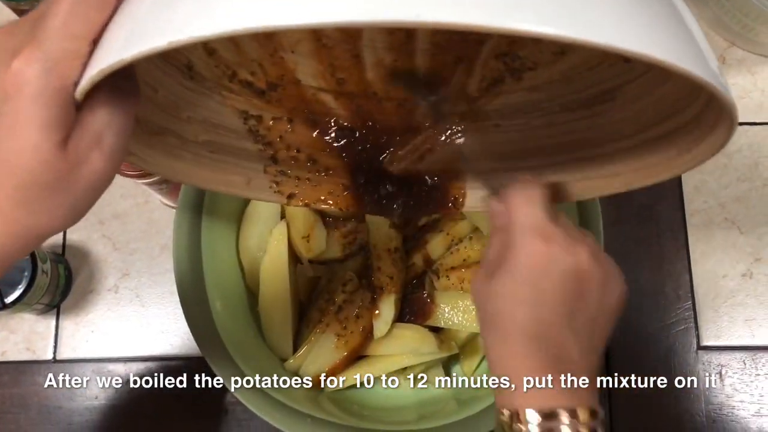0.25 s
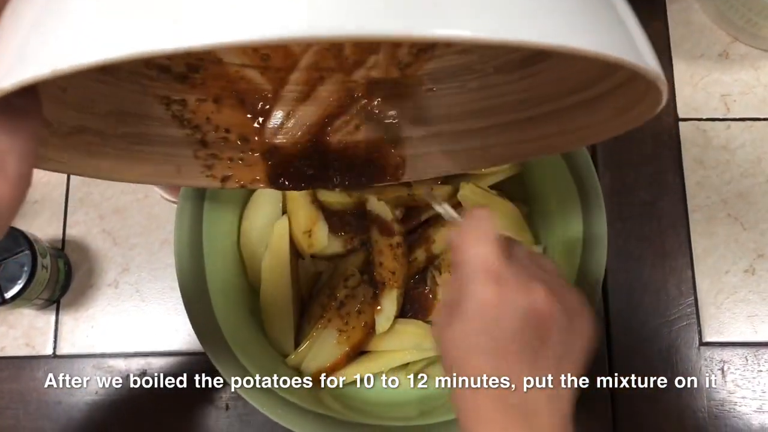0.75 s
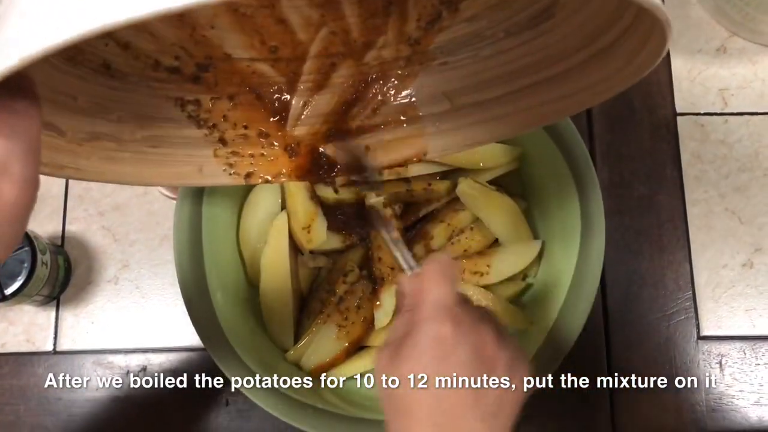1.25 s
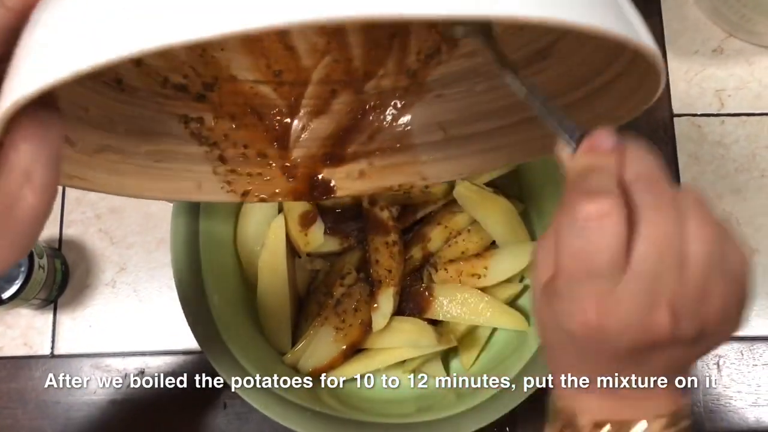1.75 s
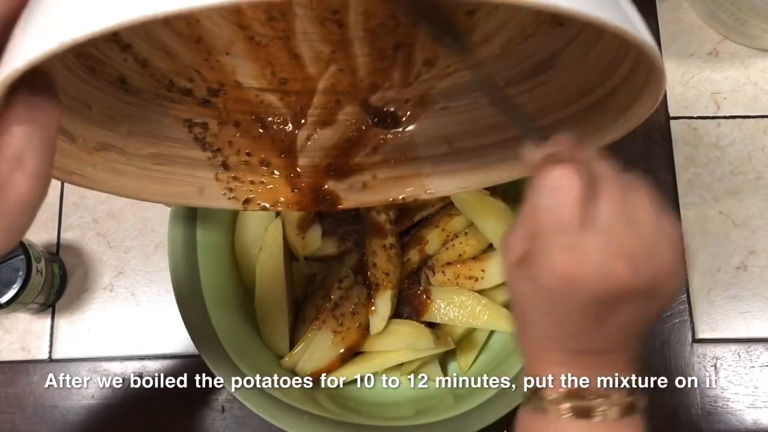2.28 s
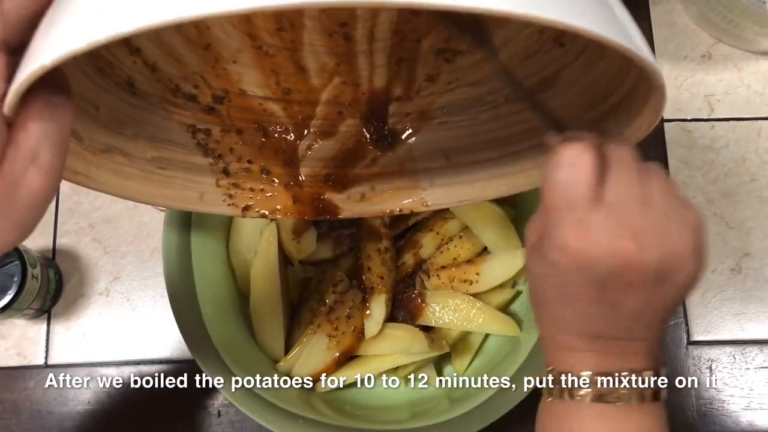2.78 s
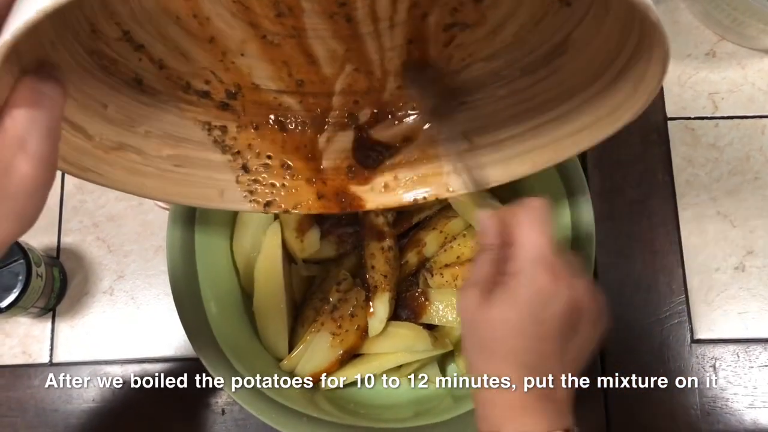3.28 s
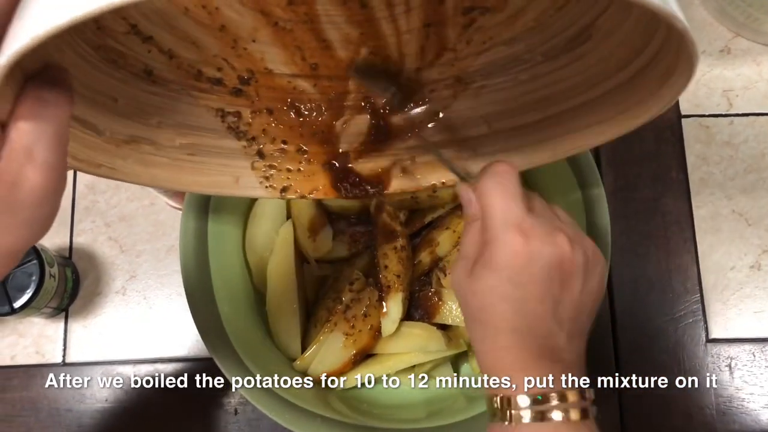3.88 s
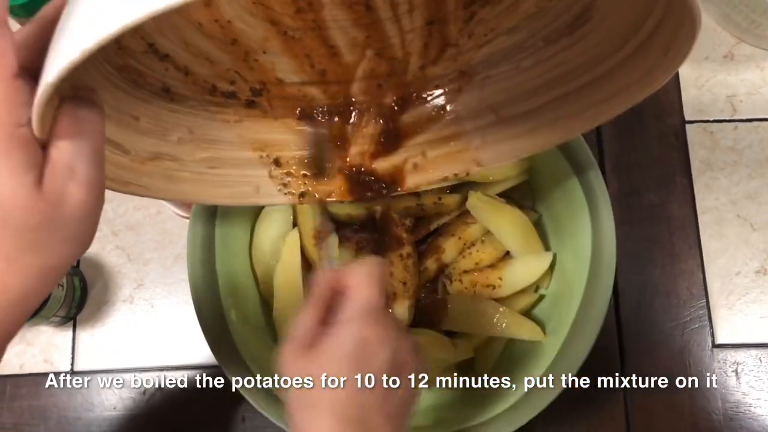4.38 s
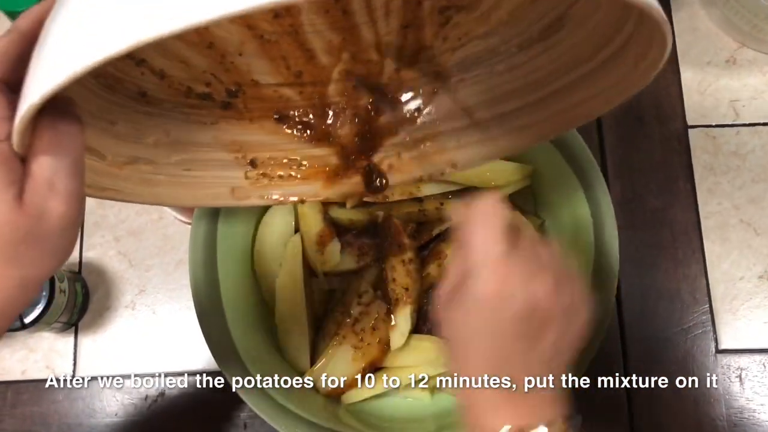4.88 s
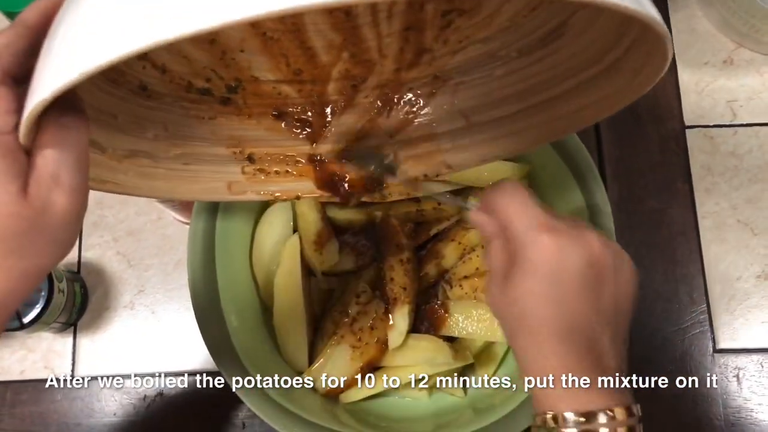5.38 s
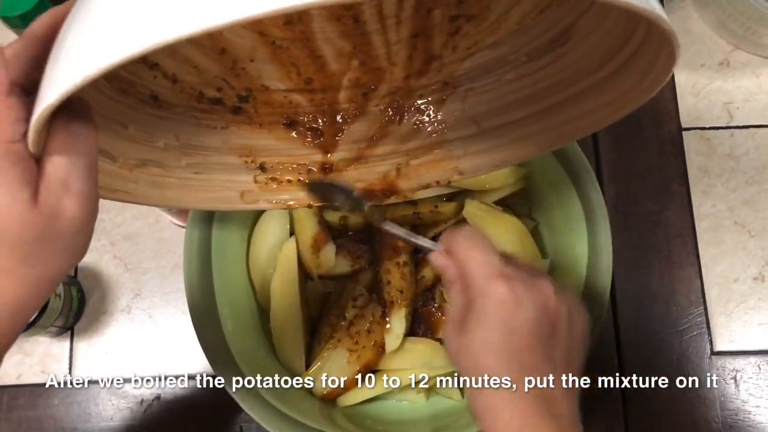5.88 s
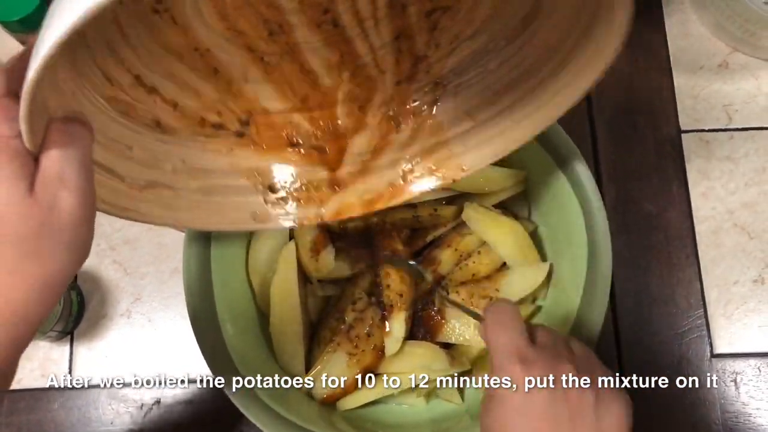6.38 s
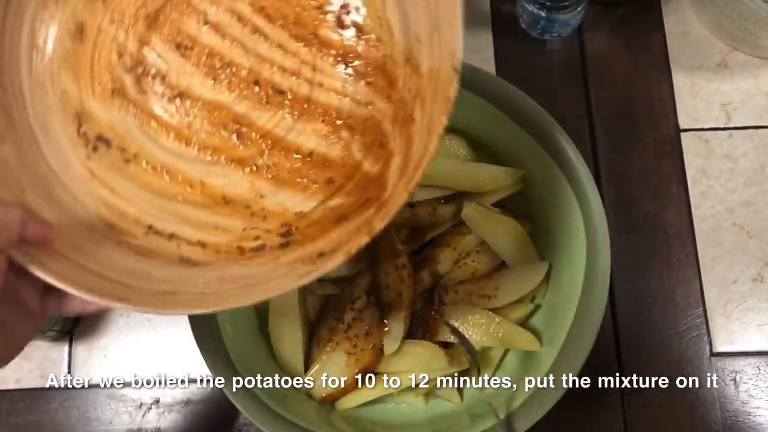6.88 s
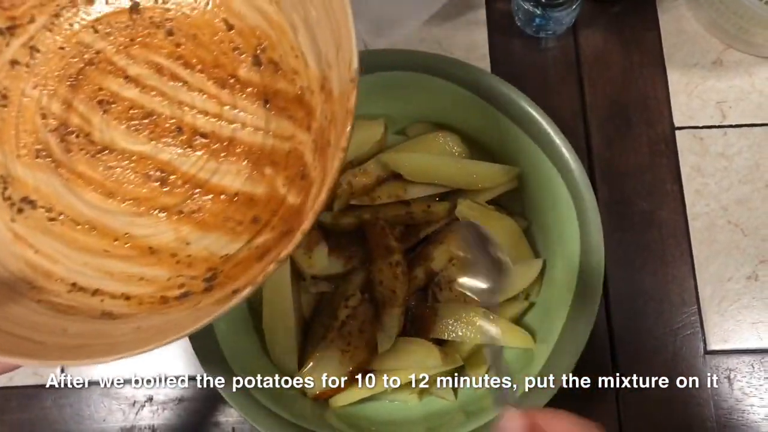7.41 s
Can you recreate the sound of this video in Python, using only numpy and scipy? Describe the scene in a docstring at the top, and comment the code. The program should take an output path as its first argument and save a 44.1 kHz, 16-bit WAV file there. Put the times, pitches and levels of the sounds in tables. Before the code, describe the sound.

A metal spoon knocks and scrapes grittily inside a wooden bowl in quick repeated strokes, then clacks several times on a plastic rim.

```python
"""Scraping and tapping bowls

A steel spoon lands on the inside of a tilted wooden bowl and drags gritty oil down its grain, stroke after
stroke; then four taps, one with a bounce, strike the rim of a plastic bowl of potatoes. Shocks and random
grit forces excite banks of resonances; a small hard kitchen answers with decaying noise. An appliance hums
and drones as filtered noise and wavering sines, and the close microphone clips on the hardest blows."""
import sys
import numpy as np
from scipy import signal
from scipy.fft import rfft, irfft, next_fast_len
from scipy.io import wavfile
from scipy.ndimage import uniform_filter1d, map_coordinates

SR = 44100
rng = np.random.default_rng(int(sys.argv[2]) if len(sys.argv) > 2 else 0)


def file_out(sig):
    """Save sig as 16-bit WAV at sys.argv[1]."""
    # one column per channel
    cols = np.atleast_2d(sig).T
    # limit, then scale
    lim = np.clip(cols, -1, 1)
    pcm = np.round(lim * 32767).astype(np.int16)
    wavfile.write(sys.argv[1], SR, pcm)


N = 337365
TIME = np.arange(N) / SR

# Pulls of the spoon: bite t/s, full-speed t/s, lift t/s; drag level/dB at these three moments, before judder;
# thud and grit hiss relative level/dB at full speed; wall relative level/dB at bite, at lift;
# squeak f/Hz at bite, at lift
PULLS = [(0.0, 0.022, 0.062, -33, -33.5, -33.5, -5.5, -6, -4, -10, 3080, 2930),
         (0.206, 0.25, 0.32, -26, -24, -21.5, -9, -8.5, 0, -9, 2050, 4500),
         (0.512, 0.594, 0.63, -32.5, -20.5, -28.5, -18.5, -8, -9, -8.5, 3230, 3450),
         (0.779, 0.91, 0.95, -40.5, -24, -27, -22, -2.5, 6, -7, 2590, 4530),
         (1.142, 1.192, 1.238, -44, -20, -22.5, -24, -6.5, 1.5, -11.5, 2520, 3000),
         (1.394, 1.483, 1.495, -43.5, -21, -31.5, -21, -4, 3.5, -20, 2300, 3140),
         (1.79, 1.89, 1.94, -50.5, -44, -37, -6.5, -1.5, -8, -14, 2930, 3400),
         (1.937, 2.06, 2.128, -28, -26, -37, -10.5, -6, -16, -8.5, 2270, 2840),
         (2.363, 2.47, 2.546, -27, -21.5, -23, -11.5, -10.5, 4, -0.5, 2120, 1950),
         (2.675, 2.695, 2.695, -41.5, -41, -46, -4, -2.5, 2, 7.5, 1850, 2040),
         (2.729, 2.763, 2.867, -47.5, -32, -29, -7.5, -6, 3.5, -5.5, 1860, 2830),
         (3.025, 3.053, 3.09, -42.5, -41.5, -47, 4.5, -1, 5, -9, 3930, 4200),
         (3.084, 3.11, 3.172, -21.5, -29, -33, -6.5, -6.5, -3, -2.5, 3250, 3000),
         (3.305, 3.396, 3.425, -35.5, -24.5, -26, -14.5, -5.5, -4, -4.5, 3500, 3320),
         (3.573, 3.64, 3.653, -40, -25, -23, -23, 0.5, -4, -6.5, 3020, 3970),
         (3.846, 3.924, 3.976, -30.5, -31.5, -36.5, -8.5, -5.5, -12, -13, 3220, 3485),
         (4.27, 4.324, 4.415, -39, -22, -28, -15, -8.5, -9, -8, 3000, 3450),
         (4.574, 4.617, 4.678, -39, -28, -20, -18.5, -6.5, -3, -10.5, 2000, 2780),
         (4.927, 4.954, 4.99, -31, -35, -32.5, -0.5, -8, -3, -7, 2930, 3150),
         (4.984, 5.04, 5.04, -25, -13, -21, -24.5, -5.5, -9, -12.5, 3060, 3410),
         (5.191, 5.268, 5.307, -43, -19.5, -22, -18.5, -2.5, -4.5, -5.5, 3097, 3670),
         (5.468, 5.54, 5.572, -44, -24, -25, -24, -2, -1, -2, 3120, 4000),
         (5.766, 5.846, 5.865, -30.5, -19.5, -26.5, -17, -6, -9, -4, 3540, 2600),
         (6.061, 6.1, 6.128, -42.5, -25, -27, -17.5, -8, 1, -7.5, 2190, 2970),
         (6.141, 6.15, 6.162, -27, -22.5, -26, -17, -5, -11, -9, 2810, 2850)]
# Spoon coming down on the wood: t/s, peak level/dB, wall, thud and click relative level/dB, clack f/Hz
LANDINGS = [(0.2008, -14.5, -8, -5, -0.5, 1830), (0.5063, -4.5, -9, -17.5, -4.5, 3500),
            (0.7752, 1.5, -3, -19, -16.5, 3000), (1.1218, -5.5, 5, -21, -18, 1719),
            (1.3705, -17, 7.5, -6, -2, 1510), (1.788, -25, -7, -4.5, -7, 2940),
            (1.8454, -25.5, 0, -16, -20, 2780), (2.3578, -2, -4.5, -14, -19, 2660),
            (2.6687, -20, -16, -23, -12, 1840), (3.0205, -18, -4, -2.5, -7, 2640),
            (3.0825, -2, -3.5, -14, -12.5, 4900), (3.2849, -11.5, -2.5, -2, -10, 1990),
            (3.55, 2.5, -11, -19, -3.5, 2860), (3.8471, -10, 0.5, -9.5, -22, 2850),
            (4.2626, -16.5, -25, -12, -5.5, 3005), (4.5439, -1.5, -0.5, -13, -32, 1550),
            (4.9072, -5.5, -6.5, -6, 2, 3324), (5.1739, -6, -9.5, -21, -3, 5100),
            (5.455, -6, -2, -12.5, 4, 3200), (5.7482, -6.5, 4, -17.5, -8.5, 1490),
            (6.0442, -11.5, 8, -14, -3, 1560)]
# Spoon skipping over a ridge of the grain: t/s, peak level/dB, wall relative level/dB, contact t/s
SKIPS = [(0.0213, -14, -11, .001), (0.0564, -13.5, -20, 0.0038), (0.2621, -14, -3, .0016),
         (0.3003, -18, -22, .0015), (0.8937, -12, -20, 0.0022), (1.2256, -10, -13, .0035),
         (1.4745, -11.5, -11, 0.0018), (1.993, -15, -11, 0.0022), (2.4169, -12, 1, .004),
         (2.5003, -13.5, 2, .003), (2.8558, -11, -20, 0.0012), (2.698, -30, -6, 0.0016),
         (3.307, -19, -10, 0.0016), (3.582, -28.5, -18, .0015), (3.5908, -10.5, -14, .0011),
         (3.6255, -21, -18, 0.0017), (3.6621, -13, -9, 0.0015), (3.8516, -10.5, -4, 0.00194),
         (3.8655, -8, -16, .001), (3.8712, -14, -7, 0.0022), (4.0, -34, -21, .0015),
         (4.3322, -14.5, -9, 0.0018), (4.361, -13.5, -5, 0.0011), (4.66, -1.5, -8.5, .002),
         (4.9849, -8, -4.5, 0.0018), (5.028, -1, -29, .0012), (5.2376, -21, -5, 0.0014),
         (5.2738, -11, -22, 0.0014), (5.53, -16.5, -8, 0.0013), (6.088, -16, -15, .002),
         (6.143, -13.5, -7, 0.0014)]
# Spoon gripping so that the wall sings: t/s, half length t/s, level/dB
GRIPS = [(0.22, 0.016, -19.5), (0.858, .012, -27), (1.444, .008, -27.5), (2.422, 0.007, -10.5),
         (2.512, .014, -14), (2.689, .015, -35), (2.802, .01, -23), (3.61, .012, -35), (4.366, .008, -29),
         (4.609, .012, -25.5)]
# Taps on the plastic rim, one with a bounce: t/s, peak level/dB, clack f/Hz
TAPS = [(6.6438, -0.5, 1710), (6.7007, -18.5, 1550), (6.8333, -6, 1550), (7.0092, 3.5, 2260),
        (7.1555, -5, 1700)]
# A faint creak: from t/s, to t/s, slip rate f/Hz, peak level/dB, resonance f/Hz, width f/Hz
CREAK = (4.178, 4.252, 130, -39, 3000, 2600)
# Soft rustles: t/s, fading t/s per 20 dB, level/dB, centre f/Hz, width f/Hz
RUSTLES = [(7.45, .12, -54, 5000, 7000), (7.555, .06, -58, 10800, 2000)]

# Resonances, each: f/Hz, width f/Hz, relative level/dB
# spoon pressed on wood
SPOON_MODES = [(1406, 153, -5), (1728, 170, -2.5), (1950, 370, -10), (2060, 430, -11.5), (2614, 384, -3),
               (3000, 200, 0), (3330, 296, -3.5), (4000, 790, -7), (4900, 440, -2), (5570, 550, -3.5),
               (6295, 1070, -5.5)]
# wooden wall
WALL_MODES = [(770, 110, -12), (930, 140, -12), (1075, 80, 0), (1250, 200, -13), (1790, 95, -6),
              (2230, 90, -11)]
# whole wooden bowl in the hand
WOOD_BOWL_MODES = [(205.5, 56, -5), (283, 140, -6.5), (368.6, 56, -0.5), (437.5, 49.5, 0), (666, 45, 2.5)]
# spoon edge
EDGE_MODES = [(6990, 550, 1.5), (8300, 4600, -3.5), (11280, 1130, -1), (12980, 560, 0), (15330, 2900, -3.5)]
# rim of the plastic bowl
RIM_MODES = [(1486, 134, 1.5), (1765, 330, 2.5), (2460, 560, -4), (3420, 320, -1.5), (4570, 1000, -5.5),
             (5780, 1700, -7.5), (7940, 2700, -15), (11300, 4000, -24)]
# side of the plastic bowl
SIDE_MODES = [(470, 60, -6), (575, 60, 0), (690, 130, -11), (900, 250, -15), (1180, 220, -11)]
# filled plastic bowl
FILLED_MODES = [(136, 57.96, -8.5), (223.01, 48, -1), (302, 49, -1), (366, 65, 0.5)]

# Gain of the whole bowl and of the edge for each dB of drag: level/dB per dB
GROWTH = (.3, 1.25)
# Drift of the whole bowl and of the edge as the spoon nears the rim: level/dB per s
DRIFT_DB_PER_S = (-27.5, 10)
# Spectrum of the appliance drone: f/Hz, relative level/dB per Hz
DRONE_SPECTRUM = [(30, -38), (75, -10.5), (100, -2.5), (135, 1.5), (165, -7.5), (200, -1.5), (340, -4.5),
                  (420, -13), (800, -10.5), (1500, -23), (3200, -21), (7000, -31.5), (16000, -39)]
# Tones of the appliance: f/Hz, level/dB, waver level/dB, phase drift/rad
TONES = [(52.5, -54, 1, .2), (3060, -73, 6, 0.88), (5950, -75, -1.5, 1.5), (6500, -74.5, 6, 1.5)]
# Decay of the kitchen: f/Hz, t60 t/s
KITCHEN_DECAY = [(100, 0.65), (700, 0.46), (1840, 0.39), (4850, 0.32), (12800, 0.15)]

BITE_S, LIFT_DB_PER_S = 0.0072, 951  # the spoon bites at once and leaves the wood more slowly
LANDING_CONTACT_S, TAP_CONTACT_S = 0.001627, 0.0019
SKIP_THUD_DB, SKIP_CLICK_DB = -24, -6.5  # the click is counted from the grit hiss of the moment
TAP_SIDE_DB, TAP_THUD_DB, TAP_CLICK_DB = -1.5, -10.5, -28
DRONE_DB = -48
DULL_FROM_HZ, TOP_HZ = 15650, 16688


def amp(db):
    """Decibel law: a level becomes an amplitude factor."""
    return 10 ** (np.asarray(db) / 20)


def unit(x):
    """Normalisation to unit root mean square."""
    return x / np.sqrt(np.mean(x ** 2) + 1e-20)


def along(points, hz):
    """Linear interpolation of (Hz, value) points on a logarithmic frequency axis."""
    f, v = np.transpose(points)
    return np.interp(np.log(hz + 1), np.log(f + 1), v)


def wobble(rate):
    """Spline interpolation of random knots, rate of them a second: a smooth random curve."""
    knots = rng.standard_normal(int(N * rate / SR) + 4)
    return map_coordinates(knots, [TIME * rate])


def filtered(x, response):
    """Convolution theorem: the spectrum of x is multiplied by a complex response of frequency."""
    m = next_fast_len(len(x) + 8192)
    return irfft(rfft(x, m) * response(np.fft.rfftfreq(m, 1 / SR)), m)[:len(x)]


def body(modes, shift_db=0):
    """Modal superposition: damped resonators add with alternating signs into one causal response."""
    centre, width, db = (np.transpose(modes) + np.outer([0, 0, 1], shift_db))[:, :, None]
    gain = (-1.) ** np.arange(len(centre))[:, None] * amp(db)

    def response(f):
        damping = 1j * f * width
        return np.sum(gain * damping / (centre * centre - f * f + damping), axis=0)
    return response


def grit(per_second, spread_db, smooth_db):
    """Shot noise: grains snap in clumps under the edge, on a white bed of smooth rubbing."""
    crowd = per_second * amp(3 * wobble(120))
    size = amp(spread_db * np.minimum(rng.exponential(size=N), 3.5))
    snaps = (rng.random(N) < crowd / SR) * size * rng.standard_normal(N)
    return unit(snaps) + amp(smooth_db) * rng.standard_normal(N)


def squeak_hz():
    """Frequency glide: the squeak moves linearly from bite to lift of each pull."""
    rows = np.array(PULLS)
    return np.interp(TIME, rows[:, [0, 2]].ravel(), rows[:, -2:].ravel())


def stroke_levels():
    """Level laws in dB for spoon, wall, whole bowl and edge: all follow the drag, each in its own way."""
    level_db = np.full((4, N), -120.)
    for bite, full, lift, bite_db, full_db, lift_db, thud_db, hiss_db, *wall_db in np.array(PULLS)[:, :-2]:
        on = (TIME > bite - BITE_S) & (TIME < lift + .06)
        t = TIME[on]
        drag_db = np.interp(t, [bite, full, lift], [bite_db, full_db, lift_db])
        bite_loss_db = 15 * np.clip((bite - t) / BITE_S, 0, 1)
        lift_loss_db = LIFT_DB_PER_S * np.clip(t - lift, 0, None)
        growth_db = np.outer(GROWTH, drag_db - full_db)
        drift_db = np.outer(DRIFT_DB_PER_S, t - full)
        thud, hiss = full_db + np.c_[[thud_db, hiss_db]] + growth_db + drift_db
        wall = drag_db + np.interp(t, [bite, lift], wall_db)
        db = np.array([drag_db, wall, thud, hiss]) - bite_loss_db - lift_loss_db
        level_db[:, on] = np.maximum(level_db[:, on], db)  # the stronger of two overlapping pulls
    return level_db


def sliding(x, centre_hz, boost_db, octaves, patchy_db):
    """Moving contact point: a broad resonance glides, the sound dulls above it and its colour flickers."""
    hz, t, z = signal.stft(x, SR, nperseg=256)
    centre = np.interp(t, TIME, centre_hz)
    octaves_above = np.log2((hz[:, None] + 1) / centre)
    glide_db = boost_db * np.exp(-.5 * (octaves_above / octaves) ** 2)
    dulling_db = -3.56 * np.clip(octaves_above, 0, 1.5)
    patches = uniform_filter1d(rng.standard_normal(z.shape), 4, axis=0)
    patches = unit(uniform_filter1d(patches, 6, axis=1))
    coloured = z * amp(glide_db + dulling_db + patchy_db * patches)
    return unit(signal.istft(coloured, SR, nperseg=256)[1][:N])


def scraping(squeak, levels_db):
    """Friction drive: the dragged spoon shakes itself, wall, bowl and edge, juddering over the wood grain."""
    force = grit(per_second=2500, spread_db=2.5, smooth_db=-0.5)
    slid = sliding(force, squeak, boost_db=4, octaves=0.22, patchy_db=4.5)
    judder = wobble(70)
    # modes, driving force, judder depth/dB, locking exponent
    parts = [(SPOON_MODES, slid, 2.3, 0.069), (WALL_MODES, force, 2.5, 0.74),
             (WOOD_BOWL_MODES, force, 1.1, 0.45), (EDGE_MODES, slid, 2.74, 0.16)]
    layers = []
    for (modes, push, depth_db, lock), db in zip(parts, levels_db):
        shake = unit(filtered(push, body(modes)))
        swing = np.sqrt(np.abs(uniform_filter1d(shake ** 2, size=500)) + 1e-3)
        # stick-slip locks to the ringing wood and evens out its swing
        layers.append(amp(db + depth_db * judder) * unit(shake / swing ** lock))
    spoon, wall, bowl, edge = layers
    # the open bowl beams the note of its wall at the microphone; the room gets less of it
    return np.array([spoon + wall + bowl + edge, spoon + amp(-4.5) * wall + bowl + edge])


def blows(events, bodies, scatter_db, lag, clack_db):
    """Impact excitation: four groups of modes ring at new strengths, close by and, smoother, to the walls."""
    out, t = np.zeros((2, N + SR)), np.arange(SR // 8) / SR
    for s, db, *relative_db, clack_hz, contact in events:
        u = t / max(contact, 2e-4)
        noise = rng.standard_normal(len(t))
        shock = 1. * (np.arange(len(t)) == round(.7 * contact * SR))
        struck = sorted(bodies[0] + [(clack_hz, 260, clack_db)])  # the spot that is hit adds its short note
        # heavy modes feel mostly one shock, light ones the chatter, which dies soonest at the edge
        groups = zip((struck, *bodies[1:]), db + np.r_[0, relative_db],
                     (.9, 1.1, 1.2, 1.6),      # haste of the chatter
                     (0.72, 0.27, 0.3, 1.0),   # share of chatter
                     (0, 0, lag, 0),           # delay t/s
                     (0, -1.5, 1, -2))         # level/dB sent to the walls
        for modes, level_db, haste, rough, late, far_db in groups:
            chatter = noise * (haste * u) * np.exp(-haste * u)
            push = rough * chatter / np.linalg.norm(chatter) + (1 - rough) * shock
            response = body(modes, rng.normal(0, scatter_db, len(modes)))
            near = filtered(push, response)
            near /= np.abs(near).max()
            far = amp(far_db) * unit(filtered(shock, response)) * np.std(near)
            out[:, round((s + late) * SR):][:, :len(t)] += amp(level_db) * np.array([near, far])
    return out[:, :N]


def wood_blows(events):
    """Impact of steel on wood: spoon, wall, whole bowl and edge ring together."""
    bodies = (SPOON_MODES, WALL_MODES, WOOD_BOWL_MODES, EDGE_MODES)
    return blows(events, bodies, scatter_db=3.5, lag=0.00205, clack_db=9.5)


def skips(squeak, levels_db):
    """Impact during sliding: the spoon skips over a ridge of the grain and clacks at its squeak."""
    drag_db, *_, hiss_db = levels_db
    events = []
    for s, db, wall_db, contact in SKIPS:
        i = round(s * SR)
        click_db = SKIP_CLICK_DB + hiss_db[i] - drag_db[i]
        events.append((s, db, wall_db, SKIP_THUD_DB, click_db, squeak[i], contact))
    return wood_blows(events)


def appliance():
    """Filtered noise and phase modulation: a steady drone, a low hum and thin wavering tones."""
    drone = unit(filtered(rng.standard_normal(N), lambda hz: amp(along(DRONE_SPECTRUM, hz))))
    out = amp(DRONE_DB + 1.2 * wobble(3)) * drone
    for hz, db, waver_db, drift in TONES:
        level = np.sqrt(2) * amp(db + waver_db * wobble(8.2))
        out += level * np.sin(2 * np.pi * hz * TIME + drift * wobble(6.7))
    return out


def kitchen(x, gap):
    """Reverberant decay: each frequency dies at its own speed; the noise tail is redrawn every quarter second."""
    out, step = np.zeros(N + 2 * SR), SR // 4
    for start in range(0, N, step):
        hz, t, z = signal.stft(rng.standard_normal(SR // 2), SR, nperseg=256)
        decay = amp(-60 * t / along(KITCHEN_DECAY, hz)[:, None])
        tail = signal.istft(z * decay, SR, nperseg=256)[1]
        wet = signal.fftconvolve(x[start:start + step], tail / np.linalg.norm(tail))
        out[start + round(gap * SR):][:len(wet)] += wet
    return out[:N]


def landings():
    """Impact of short contact: the spoon comes down on the wood."""
    return wood_blows([(*row, LANDING_CONTACT_S) for row in LANDINGS])


def singing():
    """Friction-driven resonance: each grip swells and fades as the wall's sharpest notes, slightly detuned."""
    out = np.zeros(N)
    sharp = [(hz, note_db) for hz, width, note_db in WALL_MODES if width < 100]
    for s, half, db in GRIPS:
        detune, phase = rng.standard_normal(2)
        swell_db = db - np.where(TIME < s, 14, 6) * ((TIME - s) / half) ** 2  # rises faster than it fades
        for hz, note_db in sharp:
            angle = 2 * np.pi * hz * (1 + 0.021 * detune) * (TIME - s) + 2 * phase
            out += np.sqrt(2) * amp(swell_db + note_db) * np.sin(angle)
    return out


def creak():
    """Stick-slip: nearly regular slips excite a resonance, applied twice."""
    t0, t1, rate, db, hz, width = CREAK
    slips = np.zeros(N)
    times = np.arange(t0, t1, 1 / rate)
    jittered = times + rng.normal(0, .0004, len(times))
    slips[np.round(jittered * SR).astype(int)] = amp(rng.normal(0, 1.5, len(times)))
    out = filtered(slips, lambda f: body([(hz, width, 0)])(f) ** 2)
    return out * amp(db) / np.abs(out).max()


def taps():
    """Impact on a loaded shell: the plastic rim clacks and the heavy filled bowl answers late."""
    events = [(s, db, TAP_SIDE_DB, TAP_THUD_DB, TAP_CLICK_DB, hz, TAP_CONTACT_S) for s, db, hz in TAPS]
    bodies = (RIM_MODES, SIDE_MODES, FILLED_MODES, EDGE_MODES)
    return blows(events, bodies, scatter_db=2.5, lag=0.00848, clack_db=-7.5)


def rustles():
    """Band-passed noise under exponential decay: soft rustles with a quick onset."""
    out = np.zeros(N)
    for s, fade, db, hz, width in RUSTLES:
        age = np.clip(TIME - s, 0, None)
        shape = amp(db - 20 * age / fade) * (1 - np.exp(-age / 0.0032))
        out += shape * unit(filtered(rng.standard_normal(N), lambda f: body([(hz, width, 0)])(f) ** 2))
    return out


def scene():
    """Superposition: direct sounds, the kitchen's answer to them, small noises and the appliance add up."""
    squeak, levels_db = squeak_hz(), stroke_levels()
    rub, rub_far = scraping(squeak, levels_db)
    wood, wood_far = skips(squeak, levels_db) + landings()
    sung = singing()
    plastic, plastic_far = taps()
    rub_far = rub_far + amp(-7) * sung  # the singing is beamed at the microphone too
    sent = amp(-13.5) * rub_far + amp(-14) * wood_far + amp(-10.5) * plastic_far
    room = kitchen(sent, gap=0.0074)
    return (rub + sung + wood + plastic + room + creak() + rustles() + appliance())[None]


def record(dry):
    """Saturation and band limiting: the input clips at full scale, the top treble is dulled, then cut off."""
    hard = 12  # exponent: the higher, the sharper the knee
    clipped = dry[0] / (1 + np.abs(dry[0]) ** hard) ** (1 / hard)

    def response(hz):
        dulled = amp(-32 * np.clip((hz - DULL_FROM_HZ) / 300, 0, 1))
        return (hz < TOP_HZ) * dulled
    return filtered(clipped, response)[None]


dry = scene()
out = record(dry)
file_out(out)
```